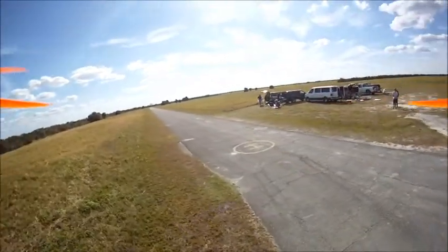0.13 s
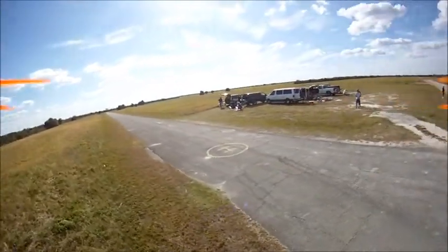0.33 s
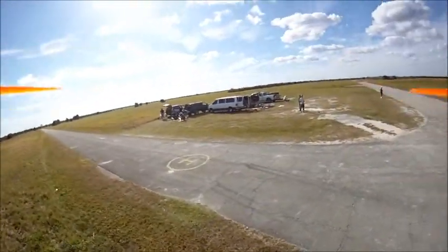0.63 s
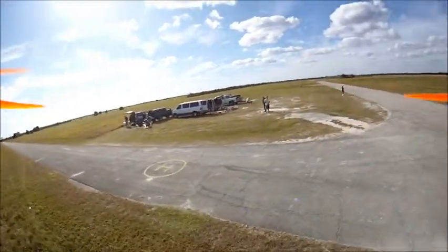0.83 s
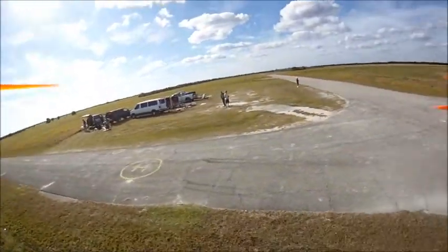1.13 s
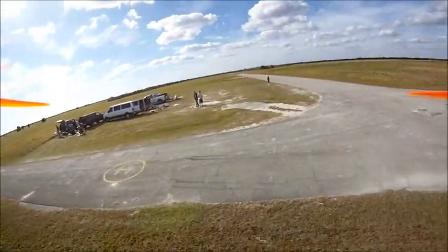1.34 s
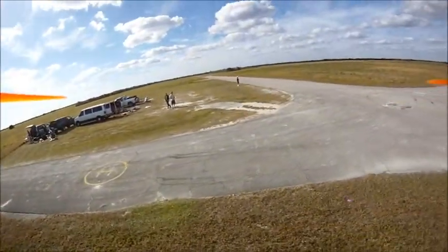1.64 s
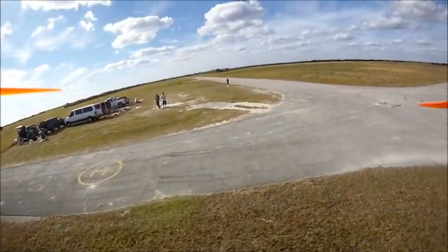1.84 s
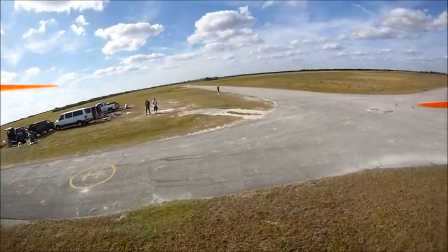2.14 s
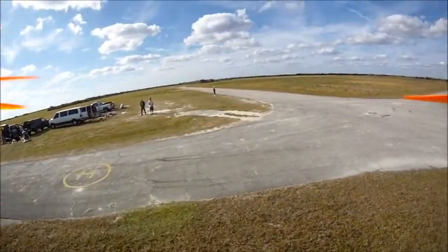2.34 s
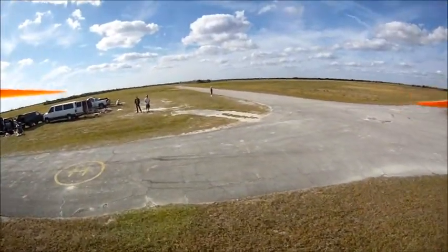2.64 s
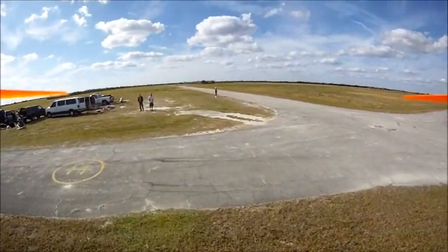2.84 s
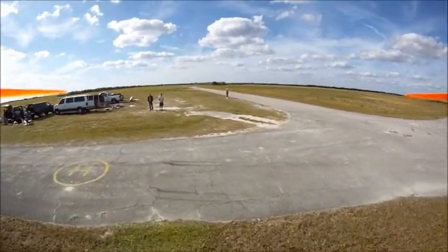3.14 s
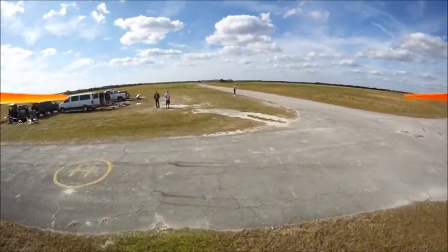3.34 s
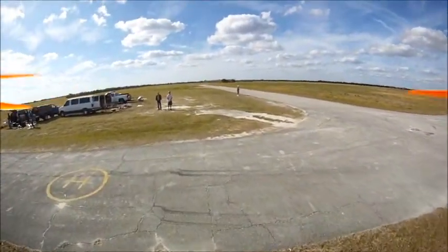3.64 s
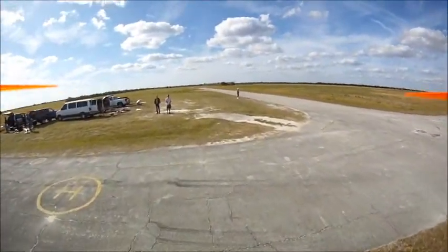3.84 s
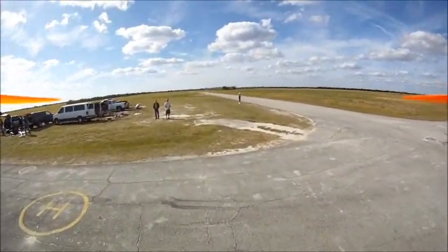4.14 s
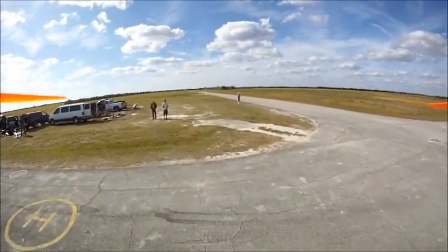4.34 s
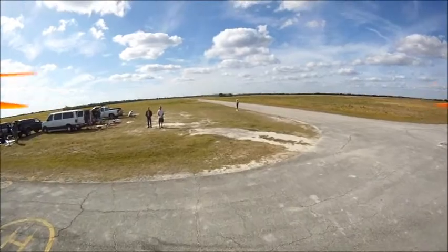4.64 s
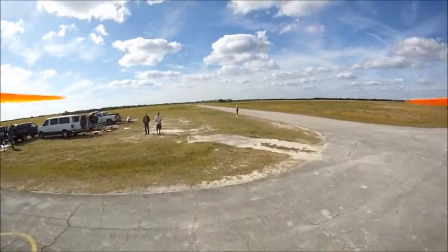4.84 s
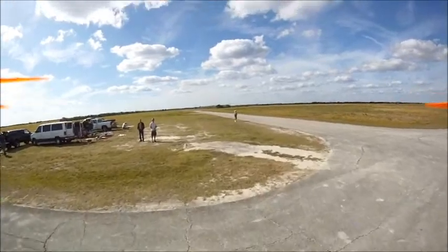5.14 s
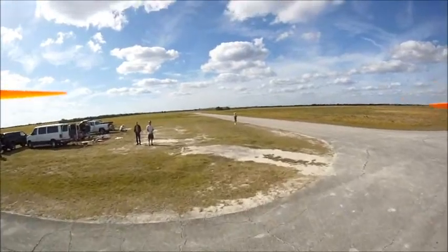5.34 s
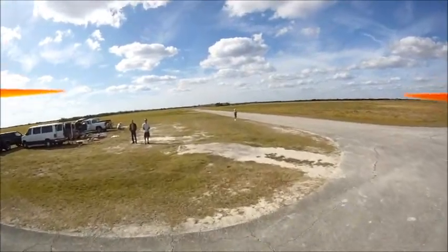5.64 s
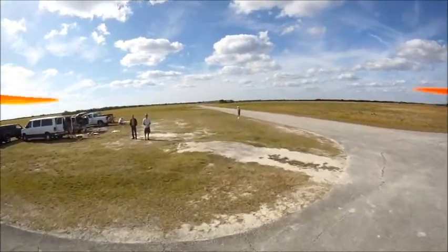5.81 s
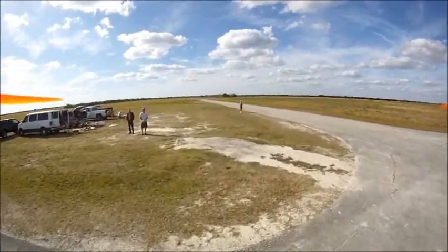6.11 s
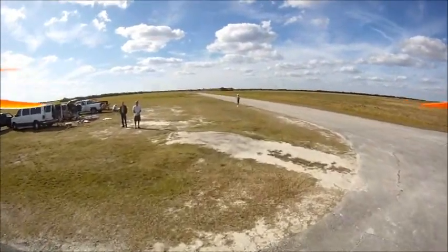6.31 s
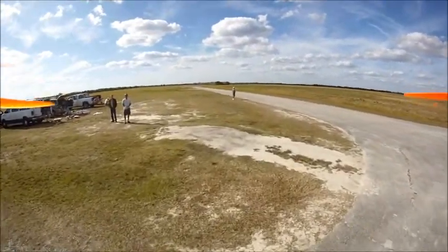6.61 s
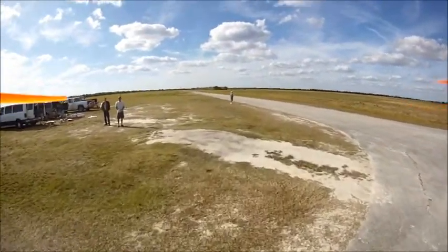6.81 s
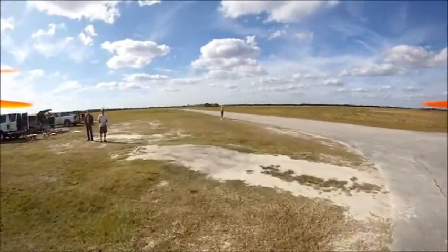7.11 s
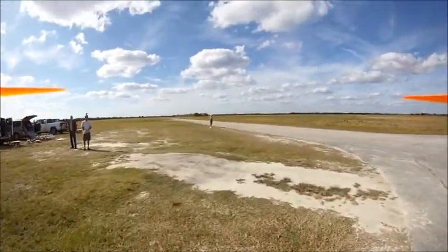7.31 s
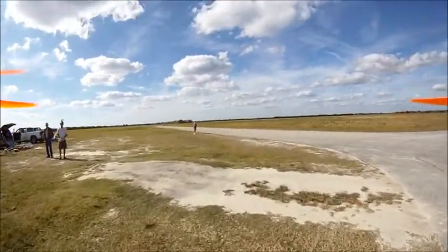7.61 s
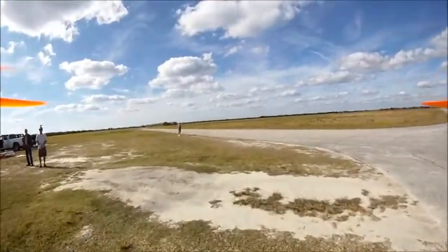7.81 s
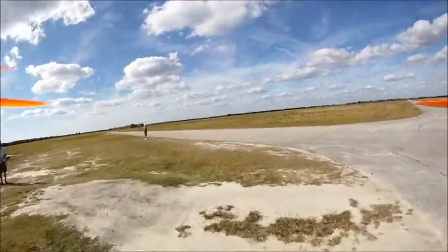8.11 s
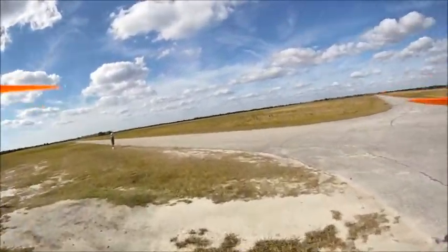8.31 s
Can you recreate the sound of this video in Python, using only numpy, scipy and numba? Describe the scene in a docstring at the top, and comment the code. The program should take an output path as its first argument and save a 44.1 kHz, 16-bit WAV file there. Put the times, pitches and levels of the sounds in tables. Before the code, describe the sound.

A small quadcopter flies low over an airfield, heard from a microphone on board. Its four propellers hum and beat against each other, wavering slightly in pitch, with a thin motor whine and blade hiss above. Wind builds over the first three seconds into a low rumble, and short gusts thump the microphone. Near the end a brighter rush of air comes up.

```python
"""A quadcopter low over an airfield, heard close up from the microphone of the small camera it carries.
From the start four propellers hum and beat as the controller trims them; motors whine and blades hiss.
Over the first three seconds it gathers speed, and wind builds on the microphone. Eddies begin to strike;
after the hard ones the camera's limiter ducks. Late in the flight a bright rush of air comes up.
Throughout, the camera holds samples at a low rate, which mirrors the whine up into the treble."""
import sys
import numpy as np
from scipy import signal
from scipy.fft import rfft, irfft, next_fast_len
from scipy.io import wavfile
from scipy.ndimage import uniform_filter1d
from numba import njit

SR = 44100
rng = np.random.default_rng(int(sys.argv[2]) if len(sys.argv) > 2 else 0)


def int16_out(signal):
    """Quantize to a 16-bit WAV file."""
    q = np.round(np.clip(np.atleast_2d(signal).T, -1, 1) * 32767)
    wavfile.write(sys.argv[1], SR, q.astype(np.int16))


N = 373086

# airflow over the microphone as the aircraft gathers speed: (time [s], level [dB re cruise])
AIRFLOW_LEVEL = [(0, -14.5), (1.2, -12), (2.15, -9), (2.95, -.5), (5, -.5), (8.46, -1.5)]
# gusts on top of it: (time [s], length [s], rumble change [dB], wash change [dB])
WIND_GUSTS = [(1.325, 0.18, 7, 10.5), (1.84, .16, 7, 9), (2.43, 0.16, 6, 2), (3.018, .2, -4, 3),
              (4.35, .1, 4, -2), (4.56, 0.16, -6, 4), (7.33, .16, 6, 3.5)]
# wind at the microphone, deep, middle and bright: (frequency [Hz], spectral level [dB])
RUMBLE_SPECTRUM = [(12, -22), (30, -9.5), (55, -2.5), (85, -1), (130, -4.5), (220, -36), (600, -46.5)]
WASH_SPECTRUM = [(50, -16), (150, 5.5), (270, 2), (400, -2.5), (600, -9.5), (900, -17), (1500, -31),
                 (3000, -30)]
RUSH_SPECTRUM = [(150, -10), (550, 5), (900, 0), (1800, -7), (2800, -6), (4500, -21)]
# the bright rush coming up late: (time [s], level [dB])
RUSH_SWELL = [(0, -64), (3.5, -58.5), (6.9, -44), (7.7, -40.5), (8.46, -43)]
# single eddies striking the microphone: (time [s], level [dB], pulse frequency [Hz])
EDDY_STRIKES = [(1.325, -14.5, 299), (1.44, -14, 303), (1.799, -5.5, 190), (3.399, -4, 207),
                (4.380, -3.5, 129), (4.581, -10.5, 260), (4.943, -5, 290), (5.2, -9, 350), (5.98, -9, 299),
                (6.799, -13, 240), (6.89, -14, 477), (7.385, -12, 350)]
# two-bladed propeller nearest the microphone, which cues the other three: (time [s], blade rate [Hz])
NEAR_RATE = [(0.0, 186.3), (0.12, 180.0), (0.6, 177.5), (0.74, 169.4), (0.96, 172.6), (1.03, 180.6),
             (1.19, 179.2), (1.4, 162.3), (1.56, 179.5), (2.32, 179.9), (2.71, 187.2), (3.06, 181.3),
             (3.52, 169.8), (4.26, 176), (4.43, 157.7), (4.56, 164.9), (5.92, 171.2), (6.0, 163.5),
             (6.8, 163.0), (7.08, 151.7), (7.56, 172.2), (8.07, 165.8), (8.46, 167.5)]
# rate about which the slow propeller opposite is steered: (time [s], blade rate [Hz])
SLOW_RATE = [(0, 173.8), (.55, 167), (.8, 153.9), (1.7, 147.8), (2.45, 164.9), (2.9, 154.9), (3.7, 165.1),
             (4.7, 153.1), (7.05, 146.1), (7.75, 168.7), (8.46, 158)]
# propeller tones; halves come from shaft imbalance: (multiple of blade rate, level [dB])
HUM_TONES = [(.5, -15), (1, -1), (1.5, -30), (2, -7), (2.5, -34), (3, -18.5), (4, -37)]
# rise and fall of the hum's overtones: (time [s], level [dB])
OVERTONE_LEVEL = [(0, -0.5), (2.4, -1), (3.9, 3.5), (4.6, -0.5), (6.5, 0.5), (8.46, -1.5)]
# hum of the near, slow, fast and fourth propeller, shifting as the aircraft leans into the airflow:
# (level at cruise [dB], lean [dB per dB of airflow])
PROPELLER_BALANCE = [(-25, -0.24), (-31.5, 0), (-33, 0.4), (-38.5, -0.5)]
# motor tones; 7 and 28 follow the 14 magnets, 21 the commutation. 8000 Hz rows are switching sidebands;
# the 12000 Hz row is the faint 42nd-multiple cogging whine, folded down at the camera's sample rate:
# (mixing frequency [Hz], multiple of blade rate, level [dB])
WHINE_TONES = [(0, 5.5, -14), (0, 6, -15), (0, 6.5, -15), (0, 7, -8), (0, 9, -18), (0, 18, -15),
               (0, 21, -8), (0, 24, -17), (0, 28, -7), (8000, -21, -5), (8000, -14, -16), (12000, -42, -22)]
# resonances of the frame that carries the whine to the microphone: (frequency [Hz], gain [dB])
FRAME_RESPONSE = [(800, -8), (950, 2), (1050, -3), (1165, 3), (1290, -5), (1500, 0), (3050, -12),
                  (3260, -2), (3430, 3), (3600, -4), (3800, -4), (4200, -7), (4400, 2), (4730, -1),
                  (4940, -5), (5040, 5), (5200, 6), (5500, 0)]
# pickup of the near, slow, fast and fourth rotor:
# (hum overtones [dB], magnetic whine [dB], sidebands and folded whine [dB])
ROTOR_PICKUP = [(0, -1, 0), (-7, -8, -1), (-5, -16, -12), (-5, -12, -10)]
# blade hiss as the camera's case colours it: (frequency [Hz], spectral level [dB])
HISS_SPECTRUM = [(250, -8), (700, -2), (1000, -8), (1180, 9), (1350, 1), (1510, 6.5), (1720, -8),
                 (3050, -4.5), (3400, -4), (3900, 4.5), (4400, 3), (5000, 1), (5600, 0)]
# blade hiss through the flight: (time [s], level [dB])
HISS_LEVEL = [(0, -39), (.8, -36.5), (1.48, -36.5), (1.55, -39.3), (3.55, -40), (3.72, -35.5), (4.3, -38.5),
              (7.7, -37.7), (8.46, -40.5)]


def undb(db):
    """Decibels to gain."""
    return np.exp(np.asarray(db) * (np.log(10) / 20))


def curve(table):
    """A timed table joined by straight lines, one value a sample."""
    return np.interp(np.arange(N) / SR, *np.transpose(table))


def walk(rate):
    """Random levels held 1 / rate s and slewed twice; spread near 1."""
    hold = max(int(SR / rate), 2)
    steps = np.repeat(rng.standard_normal(N // hold + 1), hold)
    return 1.321 * uniform_filter1d(uniform_filter1d(steps, hold), hold)[:N]


def noise(spectrum, band_hz):
    """Noise with the given spectrum and unit rms inside the band."""
    size = next_fast_len(N)
    f = np.arange(size // 2 + 1) * SR / size
    hz, db = np.transpose(spectrum)
    gain = undb(np.interp(np.log(f + 1), np.log(hz), db))
    gain /= np.sqrt(np.mean(gain ** 2 * ((f > band_hz[0]) & (f < band_hz[1]))))
    return irfft(rfft(rng.standard_normal(size)) * gain, size)[:N]


def wind(cruise_db=-33, rumble_sway_db=1.5, wash_sway_db=1.58, wash_tear_db=3, rush_tear_db=2):
    """Wind on the microphone: big eddies rumble, small ones tear past its port; a rush joins late."""
    t = np.arange(N) / SR
    flow_db = cruise_db + curve(AIRFLOW_LEVEL)
    rumble_db = flow_db + rumble_sway_db * walk(8)
    wash_db = flow_db + wash_sway_db * walk(20)
    for time_s, length_s, rumble_change_db, wash_change_db in WIND_GUSTS:
        swell = np.exp(-(2 * (t - time_s) / length_s) ** 2)
        rumble_db += rumble_change_db * swell
        wash_db += wash_change_db * swell
    tear = walk(170)
    rumble = noise(RUMBLE_SPECTRUM, (25, 75)) * undb(rumble_db)
    wash = noise(WASH_SPECTRUM, (205, 305)) * undb(wash_db + wash_tear_db * tear)
    rush = noise(RUSH_SPECTRUM, (500, 3000)) * undb(curve(RUSH_SWELL) + rush_tear_db * tear)
    return rumble + wash + rush


def buffets(raggedness=0.35):
    """Each eddy hits the microphone with one short push and pull of pressure, ragged at the edge."""
    t, out = np.arange(N) / SR, np.zeros(N)
    turbulence = noise(WASH_SPECTRUM, (20, 3000))
    for time_s, db, hz in EDDY_STRIKES:
        span = np.abs(t - time_s) < .03
        u = np.pi * hz * (t[span] - time_s)
        push = (1 - 2 * u ** 2) * np.exp(-u ** 2)
        edge = raggedness * turbulence[span] * np.exp(-np.abs(u) / 4)
        out[span] += undb(db) * (push + edge)
    return out


def steering_hz():
    """How far the near rotor departs from its mean blade rate over the surrounding second."""
    near = curve(NEAR_RATE)
    return near - uniform_filter1d(near, size=SR)


def blade_rates(airflow_db, cruise_hunt_hz=1.3, calming=0.701, counter=.7,
                fast_hz=179.65, fast_follows=.5, wander_hz=3):
    """Blade rates of the near, slow, fast and fourth rotor, as the controller mixes them."""
    near = curve(NEAR_RATE)
    hunt_hz = cruise_hunt_hz * undb(calming * airflow_db)  # ceaseless corrections, smaller in calm air
    slow = curve(SLOW_RATE) - counter * steering_hz()  # opposes the near rotor to tilt the aircraft
    slow += hunt_hz * walk(9)
    fast = fast_hz + fast_follows * (near - near.mean()) + hunt_hz * walk(9)
    fourth = (near + slow) / 2 + wander_hz * walk(5)
    return near + hunt_hz * walk(11), slow, fast, fourth


def rotor_spin(steered_hz, wobble=0.000903):
    """Blade rate and phase of one rotor, whose inertia rounds each change of speed."""
    blade_hz = uniform_filter1d(steered_hz, size=2000)
    passes = np.cumsum(blade_hz * (1 + wobble * walk(45))) / SR
    return blade_hz, 2 * np.pi * (passes + 2 * rng.random())


def propeller_hum(phase, overtone_db, flutter_db=1.6):
    """Tones locked to the shaft's turns; they flutter as uneven inflow shakes the blade load."""
    hum = 0
    for multiple, db in HUM_TONES:
        level_db = db + overtone_db * (multiple > 1) + flutter_db * walk(18)
        hum += undb(level_db) * np.sin(multiple * phase)
    return np.sqrt(2) * hum


def motor_whine(blade_hz, phase, magnetic_db, mixed_db, flutter_db=2):
    """Magnetic tones, switching sidebands and a folded cogging tone, coloured by the ringing frame."""
    t, whine = np.arange(N) / SR, 0
    for mixing_hz, multiple, db in WHINE_TONES:
        pickup_db = mixed_db if mixing_hz else magnetic_db
        ring_db = np.interp(mixing_hz + multiple * blade_hz, *np.transpose(FRAME_RESPONSE))
        tone = np.sin(2 * np.pi * mixing_hz * t + multiple * phase)
        whine += undb(db + pickup_db + ring_db + flutter_db * walk(14)) * tone
    return np.sqrt(2) * whine


def blade_hiss(chop, trim_db=-1.37, flutter_db=1.2, sway_db=0.86):
    """Air hissing off the blades, swelling as each one passes."""
    hiss = noise(HISS_SPECTRUM, (3000, 5300))
    level_db = curve(HISS_LEVEL) + trim_db + flutter_db * walk(35) + sway_db * walk(12)
    return hiss * chop * undb(level_db)


def quadcopter(swish=0.084, whine_trim_db=-38.5, strain_db_per_hz=.35, relief_db_per_db=.15):
    """Four rotors close to the microphone, beating at unlike speeds over the hiss of their blades."""
    airflow_db, overtones_db = curve(AIRFLOW_LEVEL), curve(OVERTONE_LEVEL)
    hums, whines, chop = 0, 0, 1
    rotors = zip(blade_rates(airflow_db), PROPELLER_BALANCE, ROTOR_PICKUP)
    for steered_hz, (hum_db, lean), (overtone_db, magnetic_db, mixed_db) in rotors:
        blade_hz, phase = rotor_spin(steered_hz)
        lean_db = lean * airflow_db  # moves the lowest tones only; the overtones hold their level
        hums += undb(hum_db + lean_db) * propeller_hum(phase, overtones_db + overtone_db - lean_db)
        whines += motor_whine(blade_hz, phase, magnetic_db, mixed_db)
        chop += undb(overtone_db) * swish * np.cos(phase)
    # the motors whine louder while they steer, and softer as the airflow lifts the aircraft
    whine_db = whine_trim_db + strain_db_per_hz * np.abs(steering_hz()) - relief_db_per_db * airflow_db
    return hums + undb(whine_db) * whines + blade_hiss(chop)


def scene():
    """The aircraft and its wind at the on-board microphone, in mono."""
    return (quadcopter() + wind() + buffets())[None]


@njit
def peak_envelope(x, attack, release):
    """The limiter's detector: rises fast on a peak and sinks slowly."""
    envelope, level = np.empty(len(x)), 0.
    for i in range(len(x)):
        level += (abs(x[i]) - level) * (attack if abs(x[i]) > level else release)
        envelope[i] = level
    return envelope


def record(dry, limit_db=-11.5, attack_s=0.00034, release_s=0.061,
           edge_hz=5250, converter_hz=12000, top_hz=15150):
    """The camera: its limiter ducks after hard buffets; its held samples mirror the whine upward."""
    envelope = peak_envelope(dry[0], 1 / (attack_s * SR), 1 / (release_s * SR))
    limited = dry[0] / np.maximum(envelope / undb(limit_db), 1)
    dulled = signal.sosfilt(signal.butter(14, edge_hz, fs=SR, output="sos"), limited)
    held = np.repeat(signal.resample_poly(dulled, converter_hz, SR), 4)
    mirrored = signal.resample_poly(held, SR, 4 * converter_hz)[:N]
    return signal.sosfilt(signal.ellip(10, .2, 80, top_hz, fs=SR, output="sos"), mirrored)[None]


dry = scene()
out = record(dry)
int16_out(out)
```